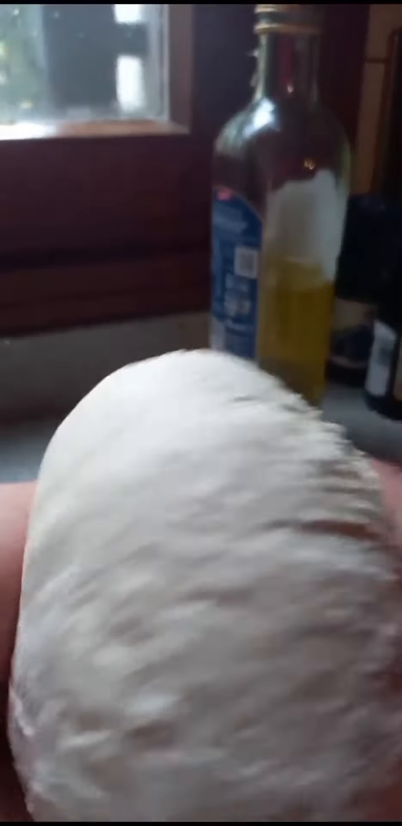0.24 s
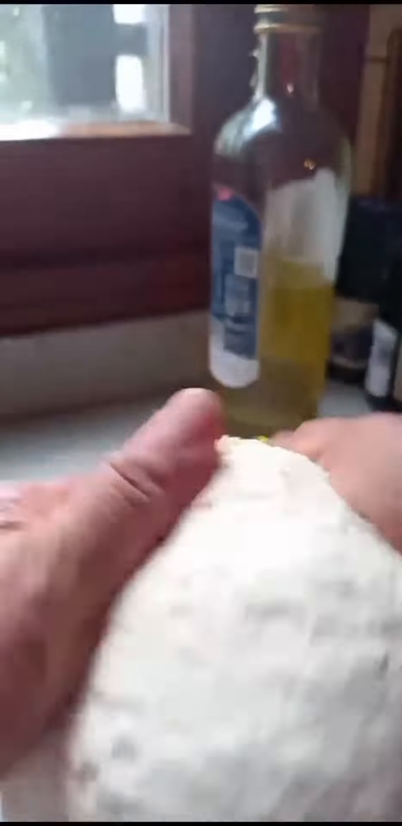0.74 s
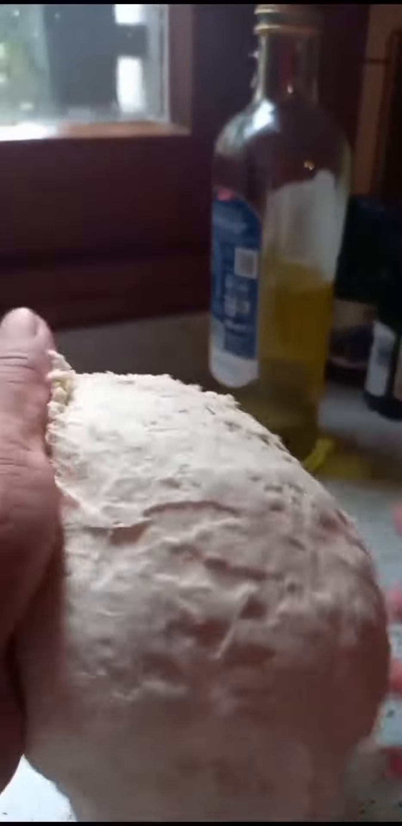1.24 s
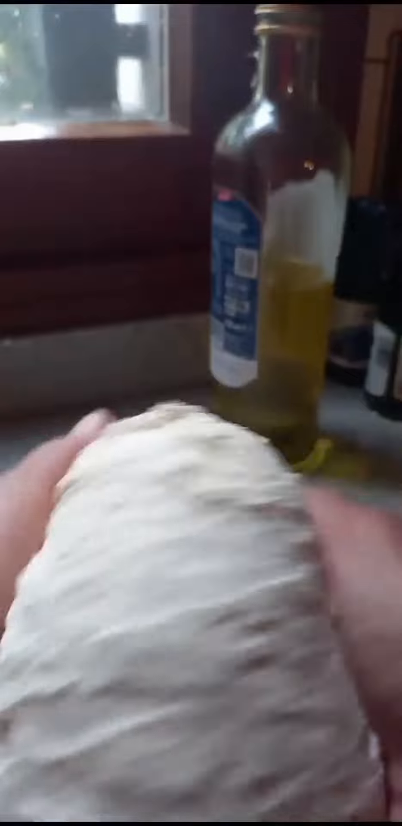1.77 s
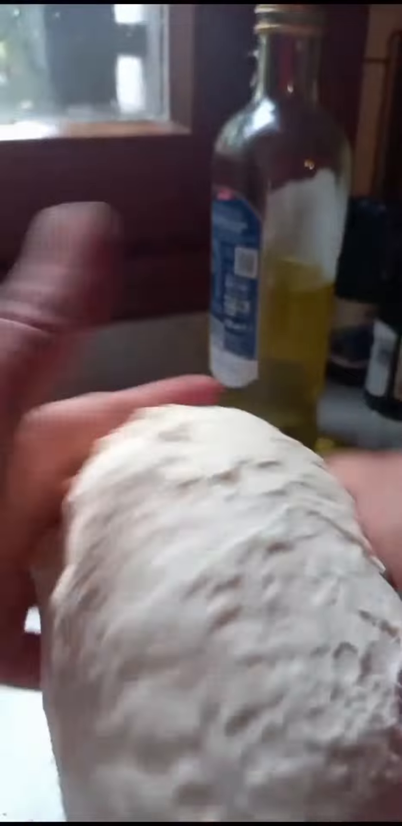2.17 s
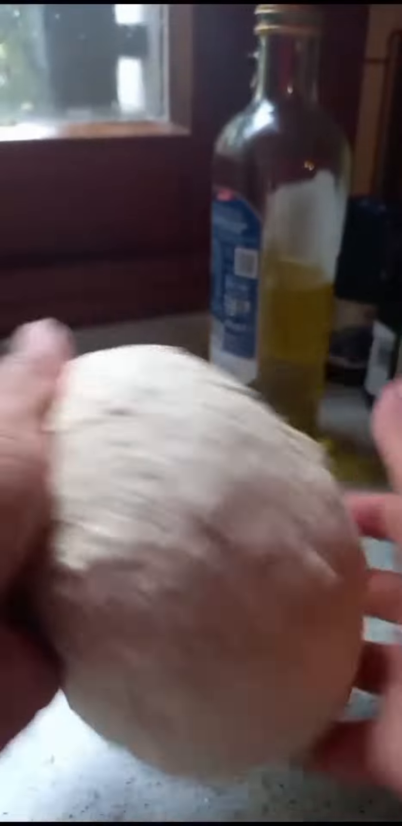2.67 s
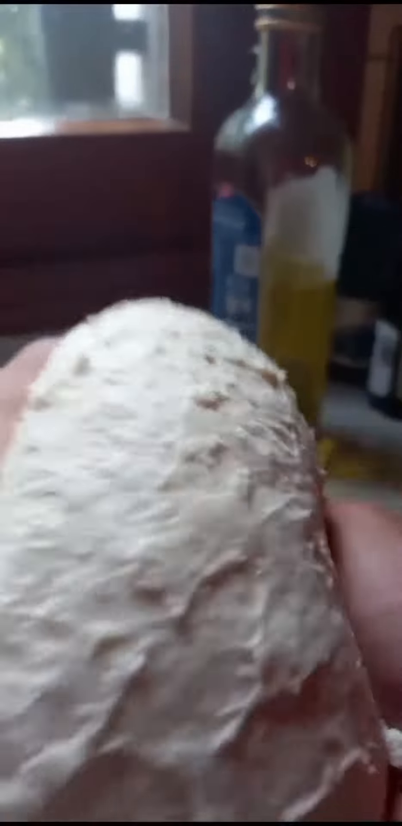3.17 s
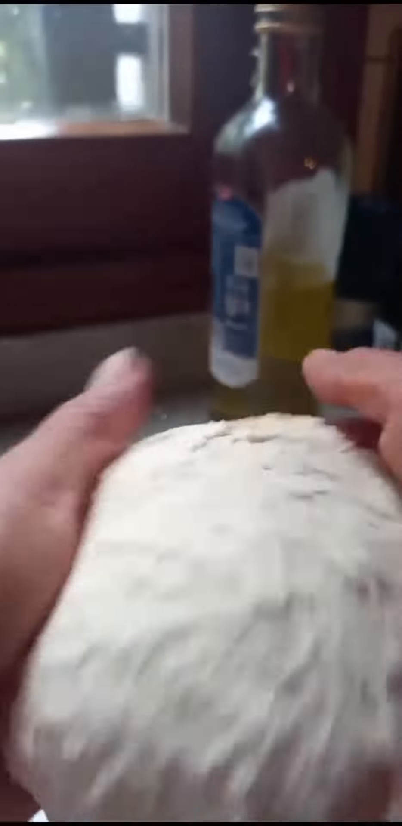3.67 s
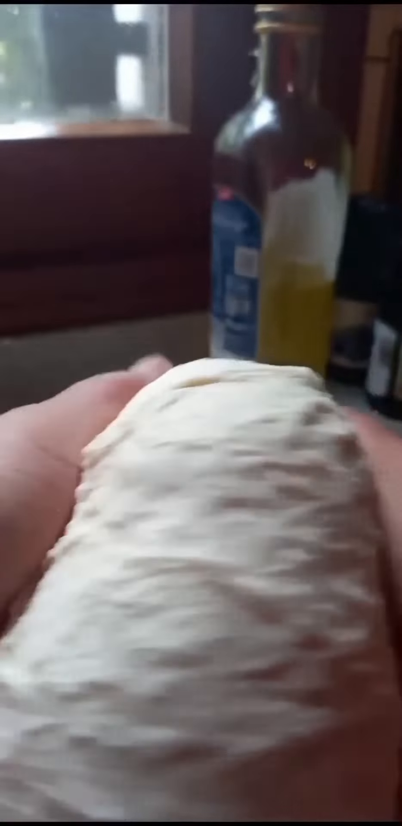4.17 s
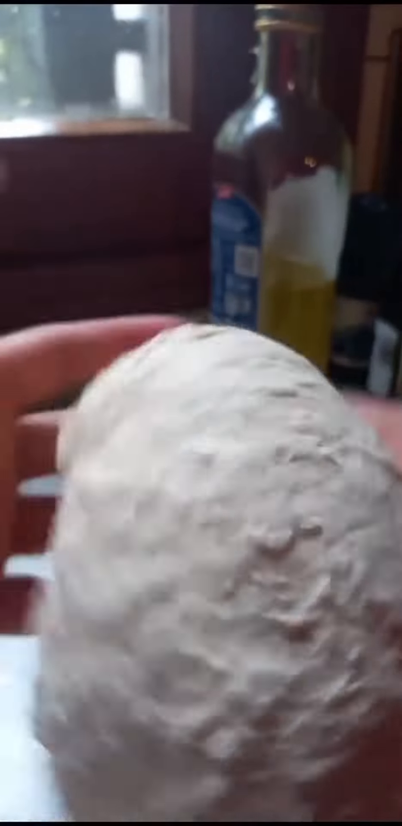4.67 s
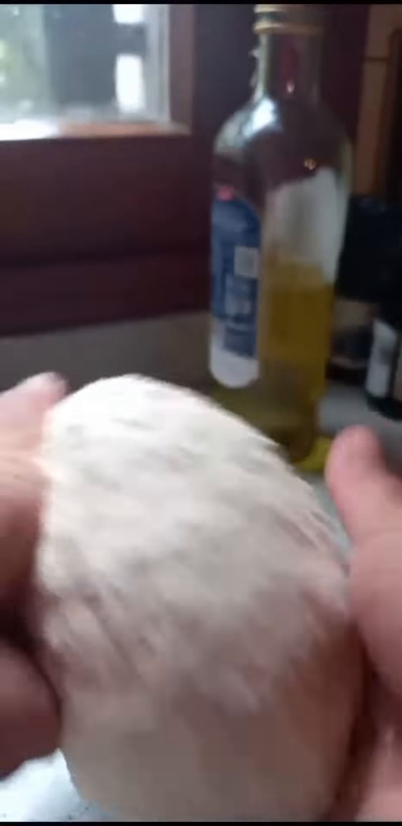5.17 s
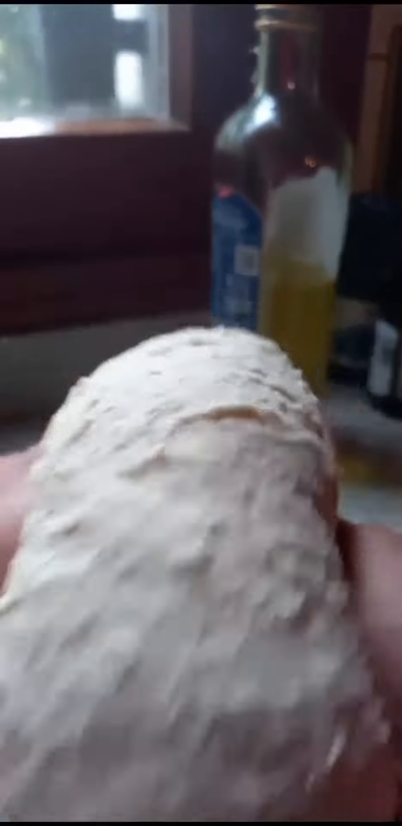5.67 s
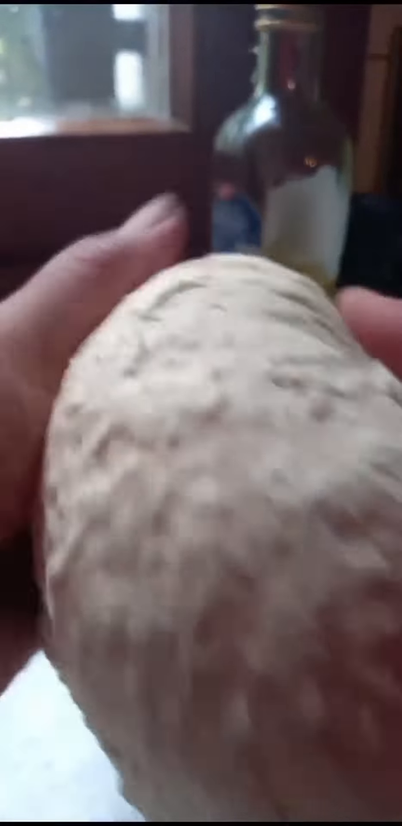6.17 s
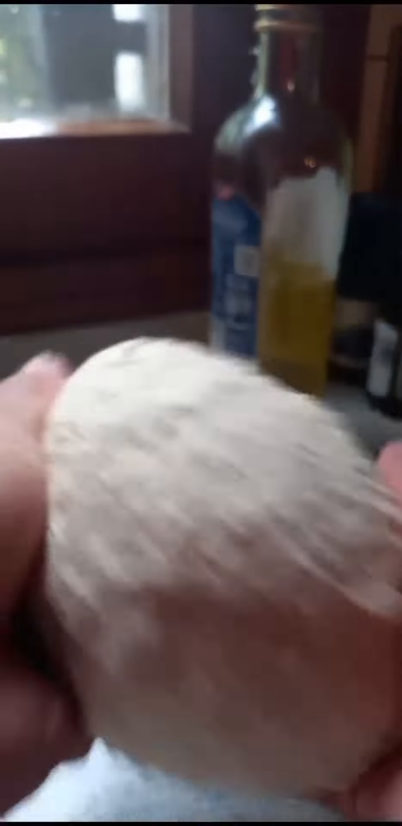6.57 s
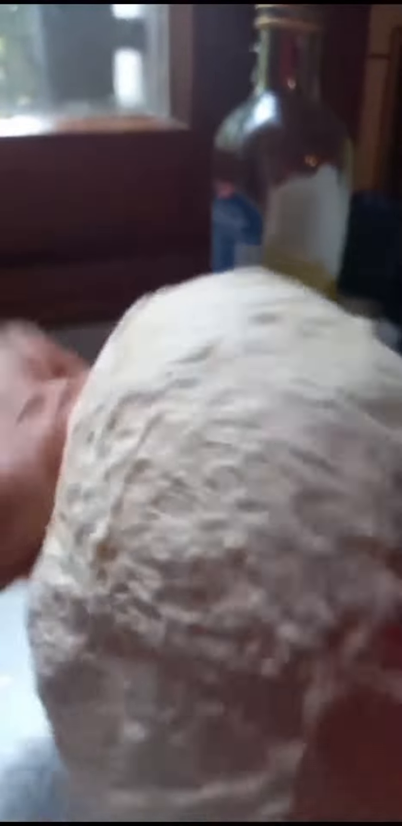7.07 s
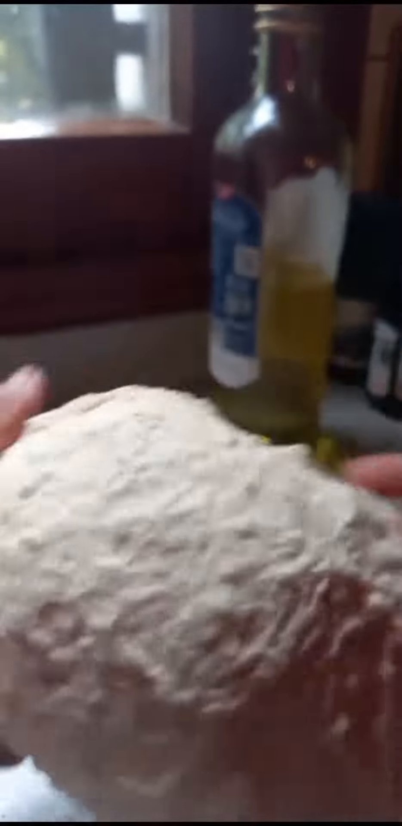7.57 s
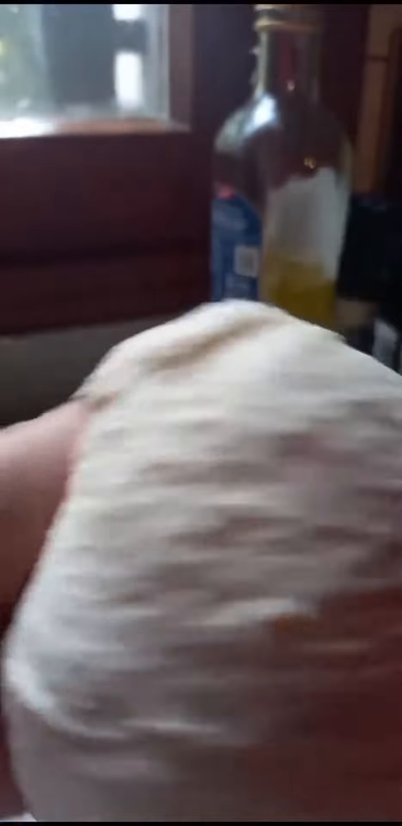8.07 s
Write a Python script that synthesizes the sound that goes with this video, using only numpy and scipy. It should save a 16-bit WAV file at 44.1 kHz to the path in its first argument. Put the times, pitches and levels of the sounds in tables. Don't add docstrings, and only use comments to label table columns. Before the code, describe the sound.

A close, slightly band-limited sound of dough being kneaded on a hollow kitchen counter. It opens mid-movement with a low thump and shove, another bump at 0.6 s, then softer rubbing and a small tick near 1.2 s. Boomy pushes and crackly strokes build from 1.6 s to a dull landing at 2 s and a heavy thud at 2.3 s, followed by a gritty floury rub at 2.5 s. It quiets, then thumps again at 3.35 s, with a hissing stroke at 3.8 s. At 4.55 s the ball is slapped down hard with a short bright ring; bumps and dense sticky crackles follow until 5 s, including a crisp tick at 4.9 s. Muffled bumps cluster from 5.8 to 6.1 s, and a strong one lands at 6.6 s. From 7 s to 8.3 s only light nudges, soft scuffs and small ticks remain over low room murmur and a faint whine.

```python
import sys
import numpy as np
from scipy import signal
from scipy.fft import rfft, irfft
from scipy.io import wavfile
from scipy.ndimage import uniform_filter1d

SR = 44100
rng = np.random.default_rng(int(sys.argv[2]) if len(sys.argv) > 2 else 0)


def how_loud(loudness_db):
    steps = np.asarray(loudness_db, float) / 20
    return 10 ** steps


def generate_wav(signal):
    frames = np.transpose(np.atleast_2d(signal))
    scaled = np.clip(frames, -1, 1) * 32767
    pcm = np.round(scaled).astype(np.int16)
    wavfile.write(sys.argv[1], SR, pcm)


N = 367779


def evened(x):
    return x / np.sqrt(np.mean(x ** 2) + 1e-20)


def peaked(x):
    return x / abs(x).max()


def coloured(x, points):
    f, db = np.transpose(points)
    hz = np.fft.rfftfreq(len(x), 1 / SR)
    gain = how_loud(np.interp(np.log(hz + 1), np.log(f + 1), db))
    return evened(irfft(rfft(x) * gain, len(x)))


def resonate(x, hz, width):
    pole = np.exp((2j * np.pi * hz - np.pi * width) / SR)
    return 2 * signal.lfilter([1 - abs(pole)], [1, -pole], x).real


def drift(seconds):
    size = max(int(seconds * SR), 2)
    return evened(uniform_filter1d(uniform_filter1d(rng.standard_normal(N), size), size))


def patchy(x, patch_db, bins, frames):
    z = signal.stft(x, nperseg=256, noverlap=192)[2]
    field = uniform_filter1d(rng.standard_normal(z.shape), bins, 0)
    field = uniform_filter1d(field, frames, 1)
    return evened(signal.istft(z * how_loud(patch_db * evened(field)), nperseg=256, noverlap=192)[1][:N])


def steadied(x, seconds, share):
    size = int(seconds * SR)
    power = uniform_filter1d(uniform_filter1d(evened(x) ** 2, size), size)
    return evened(x / (power + 0.028) ** (share / 2))


def swells(rows, bend):
    s, rise, fall, db = np.transpose(rows)[:, :, None]
    t = np.arange(0, N + 64, 64) / SR
    away = np.where(t < s, (s - t) / rise, (t - s) / fall)
    total = np.sqrt((how_loud(db - 20 * away ** bend) ** 2).sum(0))
    return np.interp(np.arange(N) / SR, t, total)


def fading(noise, t60, lead=7.6):
    return np.r_[lead, noise[1:]] * how_loud(-60 * np.arange(len(noise)) / SR / t60)


def ring(modes, rise):
    t = np.arange(0, 0.4, 1 / SR)
    out = sum(how_loud(db - 60 * t / t60) * np.sin(2 * np.pi * hz * t) for hz, db, t60 in modes)
    return peaked(out * (1 - np.exp(-t / rise)))


def snap(noise, hz, width, bright_db, t60):
    edge = np.diff(fading(noise, 0.3 * t60), prepend=0)
    body = resonate(resonate(fading(noise, t60), hz, width), hz, 1.6 * width)
    return peaked(body) + how_loud(bright_db) * peaked(edge)


def add(mix, s, sound):
    part = mix[round(s * SR):][:len(sound)]
    part += sound[:len(part)]


# f/Hz, level/dB
HUSH_SPECTRUM = [(15, -52), (25, -7.5), (100, -2), (185, -5), (341, -1), (523, -12), (1070, -21),
                 (2330, -25), (2730, -20), (3210, -25.5), (7530, -29), (8610, -36), (9570, -36.5),
                 (13200, -28), (14700, -32)]
# t/s, level/dB
MURMUR_LEVEL = [
    (0, 1.5),
    (2.6, -1.5),
    (3.7, 0.5),
    (4.25, -2),
    (4.8, 1),
    (7.4, -1.5),
    (8.34, -0.5),
]
# f/Hz, level/dB
WHINE_LINES = [(2780, 5), (3330, 3)]
# t/s, level/dB
WHINE_LEVEL = [(0, -74), (1.0, -75), (1.5, -71), (2.3, -70), (2.6, -79), (4.6, -83), (5.2, -75), (6.6, -76),
               (7.0, -84), (7.5, -77)]


def room():
    t = np.arange(N) / SR
    hush = coloured(patchy(rng.standard_normal(N), 2.1, bins=3, frames=120), HUSH_SPECTRUM)
    hush_db = -53 + np.interp(t, *np.transpose(MURMUR_LEVEL))
    whine = np.zeros(N)
    for hz, db in WHINE_LINES:
        line = resonate(resonate(rng.standard_normal(N), hz, 30.0), hz, 60.0)
        whine += how_loud(db) * evened(line)
    whine_db = np.interp(t, *np.transpose(WHINE_LEVEL)) - 10 + 4 * drift(0.08)
    return how_loud(hush_db) * hush + how_loud(whine_db) * whine


# peak t/s, rise/s, fall/s, panel level/dB, body level above panel/dB
HEAVY_SHOVES = [(0.0, .01, 0.028, -31.5, 16), (.066, 0.13, 0.18, -28, 1), (.44, 0.1, 0.041, -42, 0.5),
                (.65, 0.018, 0.1, -32.5, -4), (1.011, 0.7, 0.14, -50, 1), (1.165, 0.0084, 0.15, -49, 1.5),
                (1.561, 0.093, 0.17, -44, 7), (1.733, 0.11, 0.15, -40, 0.5), (1.99, 0.017, 0.074, -35, -6),
                (2.345, 0.018, 0.13, -22.5, -1), (2.46, 0.084, .15, -40, 12),
                (3.08, 0.061, .05, -43.5, 4.5), (3.166, 0.068, 0.083, -41, -0.5),
                (3.37, 0.024, 0.17, -28.5, -3.5), (4.556, 0.013, 0.046, -49, 8),
                (4.77, 0.019, 0.2, -31.5, 1), (5.018, 0.099, 0.048, -39.5, -2.5),
                (5.328, 0.16, 0.25, -42, -5.5), (5.81, 0.028, 0.16, -29, -1.5),
                (5.92, 0.062, 0.12, -33.5, 1.5), (6.08, 0.034, 0.1, -32, 0.5), (6.31, 0.18, .13, -29, -2.5),
                (6.53, 0.022, 0.032, -31.5, 7.5), (6.61, 0.089, 0.03, -22.5, 4.5),
                (6.66, 0.13, 0.12, -26.5, 3.5), (6.73, .05, 0.13, -38.5, 7)]
# peak t/s, fall/s, panel level/dB, body level above panel/dB
LIGHT_NUDGES = [(2.19, 0.28, -55.5, -17), (2.66, 0.036, -78, -9), (2.815, 0.045, -55.5, 4),
                (3.02, 0.13, -62.5, 19), (3.82, 0.12, -48, -0.5), (4.3, 0.11, -54.5, 1.5),
                (4.45, .15, -66, -4), (4.61, 0.11, -54, 12), (4.68, 0.13, -51, -2), (4.9, 0.22, -57.5, 14),
                (5.69, 0.19, -52.5, -7), (6.22, 0.12, -36.5, 6.5), (6.43, 0.41, -42, -9.5),
                (6.93, 0.36, -52, 8), (7.098, 0.064, -46, 7), (7.22, 0.13, -45, -0.5),
                (7.33, 0.42, -52, -3), (7.42, 0.087, -40.5, -4), (7.56, 0.77, -48.5, -1.5),
                (7.74, 0.36, -67, -6), (7.92, 0.25, -54, -12), (8.08, 0.28, -50.5, -46.5),
                (8.33, 0.2, -49, 2.5)]
# peak t/s, rise/s, fall/s, boom level/dB
CABINET_ROCKS = [(0.0, .01, 0.1, -31), (.08, .1, 0.71, -39), (.536, 0.15, 0.089, -41),
                 (.637, 0.025, 0.049, -59), (1.0, 0.19, 0.14, -46.5), (1.305, 0.17, 0.55, -45),
                 (1.574, 0.092, 0.079, -30), (1.733, 0.079, 0.1, -29), (1.913, 0.1, 0.37, -37),
                 (2.335, 0.018, 0.096, -25), (2.442, 0.11, 0.21, -26.5), (2.822, 0.071, 0.077, -46.5),
                 (3.022, 0.084, 0.35, -46), (3.356, .02, .07, -67), (3.65, 1, 0.21, -51.5),
                 (3.97, 0.099, 0.041, -47.5), (4.172, 0.16, 0.29, -52.5), (4.556, 0.0078, 0.22, -37.5),
                 (4.752, .02, 0.082, -59), (4.88, 0.087, 0.15, -32), (5.797, 0.016, 0.032, -32),
                 (6.1, 0.32, 0.27, -41), (6.37, 0.28, 0.061, -39), (6.53, 0.056, 0.014, -30.5),
                 (6.63, 0.027, 0.7, -42), (7.12, 0.48, 0.37, -59), (7.45, 0.16, 1, -55)]
# peak t/s, rise/s, fall/s, knock level/dB
TOP_SCUFFS = [(0.0, .01, 0.044, -37.5), (3.085, 0.012, 0.058, -55.5), (4.3, 0.028, 0.13, -60),
              (6.8, 0.23, 0.15, -55.5), (7.58, 0.13, 0.15, -56.5), (1.83, 0.36, 0.85, -52.5),
              (1.988, 0.011, 0.092, -43), (2.49, 0.29, 0.16, -49), (3.82, 0.11, 0.088, -51.5),
              (4.556, 0.018, 0.0086, -25), (4.68, .06, .07, -60), (5.0, 0.47, 0.36, -51),
              (7.12, 0.22, 0.067, -62), (8.04, 0.18, 0.3, -48), (8.22, 0.14, 0.97, -51)]
# f/Hz, bandwidth/Hz, level/dB
BOOM_MODES = [(106.2, 21.7, -10), (71.4, 11, -38.5)]
BODY_MODES = [(141.2, 25.6, -0.5), (191.2, 35.5, 0.1), (231.3, 10.5, -0.6), (271.4, 17.7, -3.5)]
PANEL_MODES = [(350.1, 38, 3.5), (416, 13.2, -2), (325.5, 15, -8)]
KNOCK_MODES = [(576, 158, 12.5), (714, 148, 10), (825, 80, 2), (1140, 370, -4.5)]


def counter():
    bend = 0.97
    jolts_per_s, jolt_spread_db, wander_db = 400, 2.5, 2.0
    pushes = HEAVY_SHOVES + [(s, 0.39 * fall, fall, db, up) for s, fall, db, up in LIGHT_NUDGES]
    panel = swells([row[:4] for row in pushes], bend)
    body = swells([(*row[:3], row[3] + row[4]) for row in pushes], bend)
    boom = swells(CABINET_ROCKS, bend)
    knock = np.hypot(how_loud(-19) * panel, swells(TOP_SCUFFS, bend))

    sizes = how_loud(jolt_spread_db * np.minimum(rng.exponential(1, N), 4))
    jolts = sizes * (rng.random(N) < jolts_per_s / SR)
    drive = evened(jolts * rng.choice([-1., 1.], N)) + 0.8 * rng.standard_normal(N)
    soft = signal.sosfilt(signal.butter(6, 520, fs=SR, output="sos"), drive)

    out = np.zeros(N)
    for modes, gain, push in ((PANEL_MODES, panel, soft), (BOOM_MODES, boom, soft),
                              (BODY_MODES, body, soft), (KNOCK_MODES, knock, drive)):
        hum = np.zeros(N)
        for hz, width, db in modes:
            mode = evened(resonate(resonate(push, hz, width), hz, 2.53 * width))
            hum += how_loud(db + wander_db * drift(0.032)) * mode
        out += gain * steadied(hum, 0.035, 0.8)
    return out


# peak t/s, rise/s, fall/s, fizz level/dB, rasp level above fizz/dB
FIRM_STROKES = [(.424, 0.1, 0.11, -52, 3), (.97, 0.13, 0.12, -48, -2), (1.166, 0.006, 0.018, -50, 3),
                (1.183, .015, 0.072, -55.5, 5.5), (1.8, 0.05, 0.1, -49.5, 0.5),
                (1.96, 0.11, 0.1, -47.5, -2), (2.16, 0.11, 0.044, -55, 2), (2.49, 0.083, 0.08, -40.5, -4),
                (2.54, 0.082, 0.081, -49, 7), (3.095, 0.041, 0.06, -54.5, 3),
                (3.18, 0.063, 0.085, -47, 0.5), (3.78, 0.11, 0.091, -47, -16),
                (3.84, 0.12, 0.049, -44, 0.5), (4.5, 0.01, 0.23, -46, -6), (4.55, 0.016, 0.021, -38.5, 6.5),
                (4.7, 0.075, 0.028, -46, 0.5), (4.87, 0.051, 0.15, -46, -8.5), (4.94, 0.063, 0.05, -38, -3),
                (4.962, 0.027, 0.046, -44.5, 0), (5.0, 0.061, 0.056, -45.5, 2),
                (5.96, .1, 0.022, -45.5, -4.5), (6.36, 0.21, 0.061, -44, -2),
                (7.1, 0.13, 0.13, -46.5, -3.5), (7.56, 0.067, 0.07, -46, -6.5),
                (7.65, 0.18, 0.026, -54.5, 2), (8.32, .1, 0.038, -50.5, -1)]
# peak t/s, rise/s, fall/s, fizz level/dB
FLOUR_BRUSHES = [(.1, 0.46, 1, -66), (.534, 0.077, 0.042, -57), (.8, 0.41, 0.22, -69.5),
                 (1.52, 0.26, 0.37, -61.5), (2.75, 0.11, 0.05, -61.5), (2.89, 0.25, 0.28, -59),
                 (3.39, 0.16, 0.17, -63), (3.55, 0.037, 0.078, -57.5), (3.68, .2, 0.33, -64.5),
                 (4.16, 0.25, 0.087, -58.5), (4.33, 0.11, 0.6, -58), (4.6, .05, 0.12, -65),
                 (5.332, 0.053, 0.14, -49.5), (5.53, 0.029, 0.38, -58), (5.69, 0.077, 0.23, -51.5),
                 (6.03, 0.1, 0.12, -56), (6.15, .4, 0.58, -57), (6.6, 0.041, 0.051, -53.5),
                 (6.73, .2, 0.33, -57), (7.39, 0.14, 1, -58), (7.85, 0.02, .05, -62), (7.94, .09, 1, -60.5)]
# f/Hz, density level/dB
FIZZ_SPECTRUM = [(1760, -83), (3000, -11), (6970, 0), (7600, 3.5), (8680, -0.5), (9720, 4.5), (12800, 4.5),
                 (14300, 6.5), (14700, -47)]
# f/Hz, density level/dB
RASP_SPECTRUM = [(700, -42), (1150, -9.5), (1500, -5), (1950, -2), (2800, -3), (4000, -6), (5500, -10),
                 (9000, -25.5)]


def rubbing():
    grains_per_s, grain_spread_db, flicker_db = 700, 3.0, 1.5
    brush_rasp_db = -5
    rubs = FIRM_STROKES + [(*row, brush_rasp_db) for row in FLOUR_BRUSHES]
    fizz_gain = swells([row[:4] for row in rubs], 1)
    rasp_gain = swells([(*row[:3], row[3] + row[4]) for row in rubs], 1)
    sizes = how_loud(grain_spread_db * np.minimum(rng.exponential(1, N), 5))
    grains = sizes * (rng.random(N) < grains_per_s / SR)
    slip = 0.4 * evened(grains * rng.choice([-1., 1.], N)) + rng.standard_normal(N)
    slip = patchy(slip * how_loud(flicker_db * drift(0.01)), 1.33, bins=5, frames=24)
    rasp = patchy(slip * how_loud(2.5 * drift(0.003)), 1.6, bins=3, frames=8)
    return fizz_gain * coloured(slip, FIZZ_SPECTRUM) + rasp_gain * coloured(rasp, RASP_SPECTRUM)


# t/s, peak level/dB, knock above peak/dB, papery pat above peak/dB
HAND_BUMPS = [(0.056, -24.5, -13.5, -51), (0.633, -24, -40, -36), (1.162, -39, -15, -35),
              (2.336, -10.5, -28, -49), (3.352, -15.5, -22.5, -51), (4.592, -33, -37, -5),
              (4.751, -16.5, -26.5, -55), (4.851, -28.5, -39, -15), (5.795, -21.5, -15.5, -16.5),
              (5.903, -19, -31, -30), (6.041, -20.5, -25, -35), (6.519, -37, -32, -33),
              (6.577, -12, -51, -55)]


def bumps():
    out, noise = np.zeros(N), rng.standard_normal((len(HAND_BUMPS), 6000))
    thump = ring([(hz, db, 0.06) for hz, width, db in BODY_MODES + PANEL_MODES], rise=0.0042)
    for (s, db, knock_db, pat_db), row in zip(HAND_BUMPS, noise):
        add(out, s, how_loud(db - 6.5) * thump)
        hit = fading(row, 0.28)
        knock = sum(how_loud(g) * resonate(resonate(hit, hz, w), hz, 210.0) for hz, w, g in KNOCK_MODES)
        add(out, s, how_loud(db + knock_db) * peaked(knock))
        pat = resonate(resonate(fading(row, 0.47), 690, 1000), 1030, 1800)
        add(out, s, how_loud(db + pat_db) * peaked(pat))
    return out


# t/s, peak level/dB, centre f/Hz
FURTHER_TICKS = [(0.4249, -36, 2110), (0.4394, -40, 1750), (0.6544, -39.5, 2480), (0.9243, -47, 2830),
                 (0.9418, -44, 3030), (0.9804, -35, 2010), (1.5494, -55, 2770), (1.7809, -31, 3590),
                 (1.7924, -37, 2670), (1.8004, -37, 2680), (1.938, -34, 1990), (2.4628, -38, 1990),
                 (2.489, -34, 2160), (2.4924, -28, 2110), (2.5003, -30, 2220), (2.5275, -34, 1690),
                 (2.5374, -36, 1860), (2.5446, -35, 2110), (3.1477, -42, 2100), (3.7329, -46, 3570),
                 (3.7773, -30, 3680), (4.3161, -43, 2140), (4.5096, -41, 4200), (4.825, -39, 1950),
                 (4.8823, -28.5, 3360), (4.9364, -34, 2310), (4.9454, -34, 2050), (4.9529, -23, 2020),
                 (4.9615, -31, 2450), (4.967, -35, 2460), (4.9894, -34, 1730), (5.019, -34, 3110),
                 (5.0264, -35, 1670), (5.9366, -32, 2040), (7.01, -36, 4440), (7.3866, -50, 1780),
                 (8.2023, -48, 1710), (8.2836, -42, 3680), (8.2995, -35, 2940)]


def further_ticks():
    out, noise = np.zeros(N), rng.standard_normal((len(FURTHER_TICKS), 600))
    for (s, db, hz), row in zip(FURTHER_TICKS, noise):
        add(out, s + 0.0005, how_loud(db - 3) * snap(row, hz, 1500, -8, 0.0046))
    return out


# t/s, peak level/dB, centre f/Hz, bright edge above peak/dB
STICKY_TICKS = [(0.4275, -30.5, 3230, -8), (1.165, -33.5, 2350, -4), (1.1898, -32, 2200, -13),
                (1.79, -33, 2900, -9), (1.973, -32, 1110, -10), (2.4808, -26.5, 3000, -13),
                (2.528, -31, 1860, -10), (2.578, -38.5, 2900, -23), (2.811, -44, 2380, -13),
                (3.0795, -44, 4190, -12), (3.1017, -40, 2120, -15), (3.1741, -36, 3200, -12),
                (3.7842, -29, 2490, -9), (3.83, -46, 2390, -6), (4.498, -46, 4150, -3),
                (4.988, -36, 1720, -8), (4.899, -30, 2030, 2), (5.7828, -40.5, 1530, 14.5),
                (6.261, -40.5, 2450, 18), (6.32, -40, 2340, -9), (6.3747, -30.5, 2040, -17),
                (7.103, -32, 4760, -12), (7.651, -37.5, 2200, -12), (8.31, -34, 3020, -11)]
# t/s, peak level/dB, centre f/Hz, bright edge above peak/dB
DRY_POP = (4.9282, -18, 5000, -18)


def ticks():
    out, noise = np.zeros(N), rng.standard_normal((len(STICKY_TICKS) + 1, 1500))
    for (s, db, hz, bright_db), row in zip(STICKY_TICKS, noise):
        add(out, s, how_loud(db) * snap(row, hz, 1000, bright_db, 0.005))
    s, db, hz, bright_db = DRY_POP
    add(out, s, how_loud(db) * snap(noise[-1], hz, 7000, bright_db, 0.002))
    return out


# t/s, peak level/dB, crack above peak/dB, skin ring above peak/dB
BALL_SLAPS = [
    (1.983, -19.5, -42, -12),
    (4.5442, -13, -6, -4),
]
# f/Hz, level/dB, t60/s
LOW_MODES = [
    [(102, -38, 0.15), (173, 6, 0.041), (363, 7, 0.028), (493, -2, 0.014)],
    [(99, -47, 0.21), (168, 13, 0.046), (315, 7, 0.072), (200, 9, 0.045)],
]
# f/Hz, level/dB, t60/s
TOP_MODES = [
    [(590, 3, 0.0059), (910, -26, 0.032), (1194, -33.5, .08), (1930, -28.5, 0.04)],
    [(704, 3, 0.026), (830, -13, 0.13), (1007, -12.5, 0.11), (1220, -16.5, .12), (1985, -3.5, 0.03),
     (2760, -7, 0.02), (3640, -11, 0.025), (4720, -6.5, .015)],
]
TOP_LEVELS = [-15, -10.5]
# f/Hz, bandwidth/Hz, level/dB
SKIN_MODES = [(790, 56, 7), (1080, 70, -2.5), (1200, 110, -18), (1800, 220, -4), (2900, 550, -12),
              (3620, 700, -14)]


def slaps():
    out, noise = np.zeros(N), rng.standard_normal((len(BALL_SLAPS), 8000))
    for slap, row, low, top, top_db in zip(BALL_SLAPS, noise, LOW_MODES, TOP_MODES, TOP_LEVELS):
        s, db, crack_db, skin_db = slap
        add(out, s - 0.0005, -how_loud(top_db) * ring(top, rise=0.00047))
        add(out, s + 0.0025, how_loud(db + crack_db) * snap(row, 4600, 3500, -16, 0.019))
        flutter = fading(row, 0.018, lead=3.) + 0.03 * fading(row, 0.15)
        skin = sum(how_loud(g) * evened(resonate(flutter, hz, w)) for hz, w, g in SKIN_MODES)
        add(out, s, how_loud(db + skin_db) * peaked(skin))
        add(out, s + 0.0029, -how_loud(db) * ring(low, rise=0.0025))
    return out


def walls(x):
    t60, delay = 0.26, 0.0049
    t = np.arange(0, 0.4, 1 / SR)
    tail = rng.standard_normal(len(t)) * how_loud(-60 * t / t60) * (t > delay)
    tail = signal.sosfilt(signal.butter(1, 1800, fs=SR, output="sos"), tail)
    return signal.fftconvolve(x, tail / np.linalg.norm(tail))[:N]


def scene():
    hits = bumps() + ticks() + slaps()
    mix = room() + counter() + rubbing() + further_ticks() + hits + how_loud(-12.0) * walls(hits)
    return mix[None]


# f/Hz, level/dB
PORT_RESPONSE = [(100, 1.5), (8100, -2), (8450, -1), (8850, -2), (9200, 1), (20000, 1)]


def port(x):
    return coloured(x, PORT_RESPONSE) * np.std(x)


# lower f/Hz, upper f/Hz
NOTCH_BANDS = [(8300, 8700), (8700, 9100)]


def gated(x):
    hz, _, z = signal.stft(x, SR, nperseg=1024, noverlap=768)
    out = z.copy()
    for lo, hi in NOTCH_BANDS:
        band = (hz > lo) & (hz <= hi)
        power = uniform_filter1d((abs(z[band]) ** 2).mean(0), size=5)
        faint = power < np.percentile(power, 13)
        out[band] = z[band] * how_loud(-28 * faint)
    return signal.istft(out, SR, nperseg=1024, noverlap=768)[1][:N]


def band_limit(x):
    return signal.sosfilt(signal.butter(12, 14820, fs=SR, output="sos"), x)


def record(dry):
    thin = signal.sosfilt(signal.butter(6, 44., "high", fs=SR, output="sos"), dry[0])
    edge = signal.firwin(511, 14120, window=("kaiser", 9), fs=SR)
    mix = signal.oaconvolve(gated(port(thin)), edge, "same")[None]
    return band_limit(mix)


dry = scene()
out = record(dry)
generate_wav(out)
```